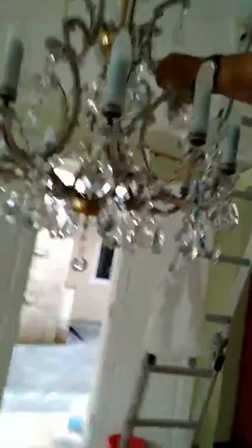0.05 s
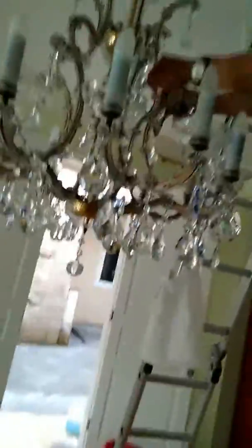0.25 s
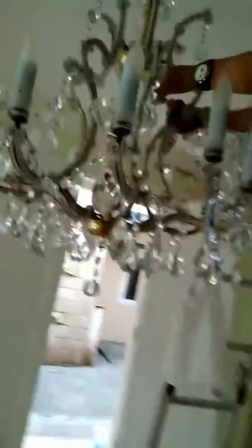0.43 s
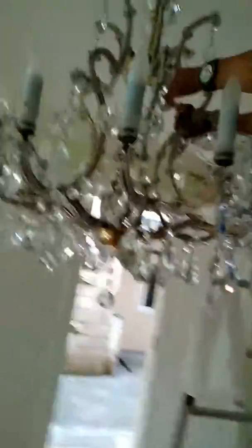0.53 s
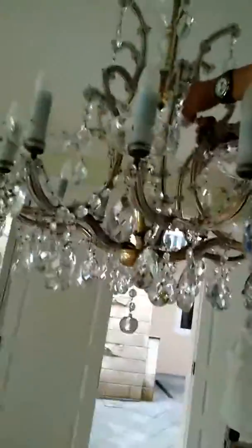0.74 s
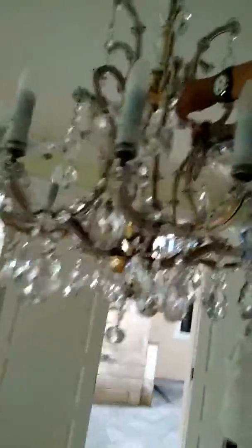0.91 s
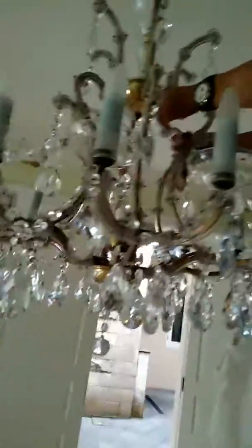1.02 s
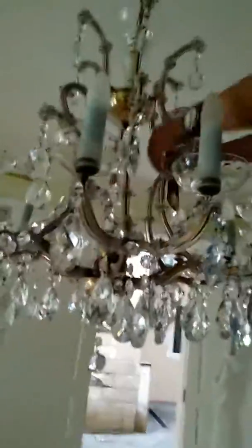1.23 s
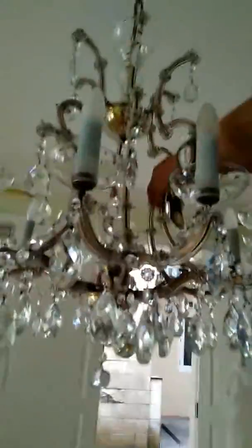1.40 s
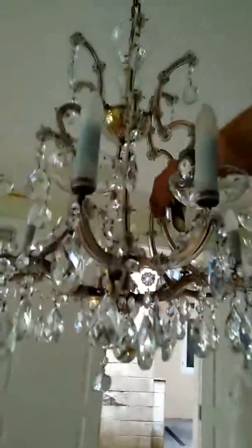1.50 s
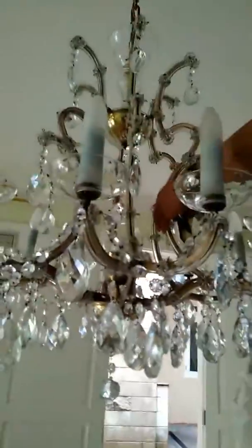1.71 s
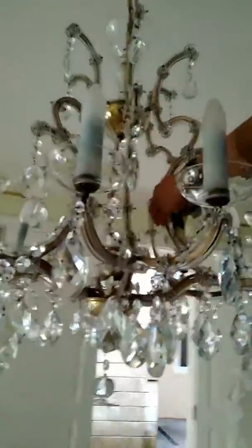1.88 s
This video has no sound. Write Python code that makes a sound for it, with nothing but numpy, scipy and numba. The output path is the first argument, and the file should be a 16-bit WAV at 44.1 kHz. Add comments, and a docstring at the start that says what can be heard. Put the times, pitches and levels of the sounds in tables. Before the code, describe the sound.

Chandelier glass drops clink in a quick jangling flurry, then one sharp high tick, room echoing

```python
"""Shaken chandelier in an echoing room

A hand shakes the glass drops of a chandelier in a bare room, close to a phone, in two bouts. Ticks of glass on
glass excite damped modes of drops, dishes, arms and frame; short, narrow tones linger. Decaying noise,
convolved with these sounds, is the room; level curves make each bout dip sharply and swell again, and shaped
noise with a few dull sine bumps is the faint hum beneath."""
import sys
import numpy as np
from scipy import signal
from scipy.fft import rfft, irfft
from scipy.io import wavfile
from scipy.ndimage import uniform_filter1d, minimum_filter1d
from numba import njit

SR = 44100
rng = np.random.default_rng(int(sys.argv[2]) if len(sys.argv) > 2 else 0)


def wrap_up_sound(samples):
    """Save the sound to the file named by the first command line argument, as 16-bit audio."""
    columns = np.atleast_2d(samples).T
    # keep every value between -1 and 1, then stretch to whole-number steps
    tamed = np.clip(columns, -1, 1)
    steps = np.round(tamed * 32767).astype(np.int16)
    wavfile.write(sys.argv[1], SR, steps)


N = 85995
LEAD_S = .3  # computed before the start, so that an earlier clink is still ringing
TOTAL = N + int(LEAD_S * SR)
PORTS_ALIKE_HZ = 636  # scale below which the two microphone ports receive nearly the same wave
MID_SIDE = np.array([[1], [-1]])  # sign of the side signal at the left and right port


def undb(db):
    """Level law: 20 dB is a factor of ten in amplitude."""
    return 10 ** (np.asarray(db) / 20)


def curve(rows, x):
    """Linear interpolation through (x, y) rows, held constant beyond the ends."""
    return np.interp(x, *np.array(rows).T)


# Clinks of the shaken glass, relative levels: [t/s, drops level/dB, drops peak f/Hz, dishes level/dB,
# arms level/dB, arms peak f/Hz, frame level/dB, left minus right level/dB, burst length t/s,
# direct sound against room feed level/dB]
CLINKS = [(-.2, -17.5, 10000, -24, -29.5, 2160, -39.5, -1, 0.013, 2),
          (0.1538, -29, 11080, -36.5, -40, 2600, -55.5, 0, 0.0088, -6.5),
          (.175, -31.5, 10800, -35.5, -43.5, 2600, -65.5, 0.5, .03, -6),
          (0.2402, -13, 10000, -29, -37, 2900, -49, 2, 0.0029, 4.5),
          (.252, -12.5, 12800, -26, -36.5, 1970, -46.5, -1, 0.0074, 9.5),
          (.266, -23.5, 12040, -28, -33.5, 1900, -40, 4, 0.0027, -11),
          (.279, -24, 8970, -31, -59, 1970, -43.5, -3.5, 0.001, -14.5),
          (0.3014, -22.5, 12000, -29, -40, 2480, -36.5, 2, 0.0058, -7.5),
          (0.3204, -17.5, 11260, -32, -33.5, 2440, -36.5, 2, .006, -5),
          (0.3713, -14, 13500, -27.5, -26.5, 2412, -33.5, 1, .004, -4),
          (.382, -16.5, 10000, -19.5, -23.5, 2200, -29, -0.5, .018, -7),
          (0.4393, -16.5, 12150, -25.5, -29, 2200, -31, 1.5, .008, -4),
          (0.4602, -7.5, 12000, -15.5, -20, 2680, -31, -3, .005, -2),
          (.476, -13, 11000, -21.5, -21.5, 1800, -39, 2, .012, -3.5),
          (.58, -24, 11000, -33, -40.5, 2398, -39.5, -3.5, 0.011, 1),
          (.82, -33, 10000, -33.5, -31.5, 2110, -49, 3, 0.0097, -6),
          (0.848, -24.5, 11230, -34.5, -43, 1970, -44, -2, 0.02, -4.5),
          (1.231, -24.5, 12690, -68.5, -84, 2006, -62, 1, 0.012, -4.5),
          (1.244, -30.5, 12300, -63.5, -73, 2008, -53.5, 1, .02, -4.5),
          (1.3912, -9.5, 12750, -46, -53.5, 1470, -73, -2.5, 0.0027, 7)]
TICKS_PER_CLINK, BURST_FALL_DB, TICK_SCATTER_DB = 13, -11.5, 0.5  # fall over the whole burst length


def clinks(rows):
    """Repeated impact: a clink is a short burst of ticks, the first on time, the later ones weaker."""
    (start, drops, drop_hz, dishes, arms, arm_hz, frame,
     pan, length, direct) = np.repeat(rows, TICKS_PER_CLINK, axis=0).T
    shape = (len(rows), TICKS_PER_CLINK)
    late = (rng.random(shape) * (np.arange(TICKS_PER_CLINK) > 0)).ravel()
    scatter = TICK_SCATTER_DB * rng.standard_normal(shape).ravel()
    extra = scatter + BURST_FALL_DB * late
    return strike_glass(start + late * length, drops + extra, drop_hz, dishes + extra,
                        arms + extra, arm_hz, frame + extra, pan, direct)


# Modes of the glass drops, dishes, arms and frame: [f/Hz, relative level/dB, 60 dB decay t/s]
DROPS = [(7730, -4, 0.0094), (8980, -6, 0.041), (10390, 0, 0.029), (11500, -2, 0.014), (12430, 1, 0.026),
         (13930, -0.5, 0.018), (13500, 3, 0.0058), (14700, -3.5, 0.03), (14350, -1, .01)]
DISHES = [(3154, -9.5, 0.023), (3395, -8, 0.033), (4002, -8, 0.026), (4290, -9, 0.054), (4803, -2.5, 0.038),
          (5307, -5.5, 0.04), (5680, -5, .03), (6305, -3.5, .03), (6710, -3, 0.031), (7170, -5.5, 0.066),
          (8000, 6.5, 0.02)]
ARMS = [(1352.5, -7.5, 0.039), (1600, -3.5, 0.039), (1900, 0.5, 0.03), (2107, -3.5, 0.035), (2353, -6, .05),
        (2600, -7, 0.1), (2875, -2.5, 0.049)]
FRAME = [(287, -18.5, 0.041), (416, -8.5, 0.032), (527, -10, 0.042), (653, -5, 0.032), (820, -5.5, 0.035),
         (934, -4, 0.038), (1108, -6.5, 0.03)]
# Dry crack of glass on glass: [f/Hz, relative level/dB, 60 dB decay t/s]
CRACK = [(1520, -8.5, 0.011), (2700, -5, .008), (3900, -1.5, 0.0068), (5100, 0.5, .006), (5900, 1.5, .006),
         (6600, 0, .006)]
CRACK_DB = -21  # against the drops
# Spread of pitch from piece to piece, standard deviation of ln f
DROP_SIZES, DISH_SIZES, ARM_SIZES, CRACK_SIZES = 0.0586, .05, 0.04, 0.026
DROP_WIDTH_HZ, ARM_WIDTH_HZ = 3600, 716  # modes this far from the loudest pitch are 6 dB down


def strike_glass(times, drops_db, drop_hz, dish_db, arm_db, arm_hz, frame_db, pan, direct_db):
    """Modal excitation: each tick cracks and sets drops, dishes, arms and frame ringing."""
    where = (pan, direct_db)
    drops = ring(times, drops_db, *where, DROPS, DROP_SIZES, drop_hz, DROP_WIDTH_HZ)
    dishes = ring(times, dish_db, *where, DISHES, DISH_SIZES)
    crack = ring(times, drops_db + CRACK_DB, *where, CRACK, CRACK_SIZES)
    arms = ring(times, arm_db, *where, ARMS, ARM_SIZES, arm_hz, ARM_WIDTH_HZ)
    frame = ring(times, frame_db, *where, FRAME, ARM_SIZES)
    return drops + dishes + crack + arms + frame


# Balance of the two microphone ports: [f/Hz, left minus right level/dB]
PORT_BALANCE = [(500, 0), (1400, 1.5), (2800, 0.5), (5600, 0), (9500, -2.5), (11500, -1), (14000, 4.5)]
MODE_SCATTER_DB, SWELL_CYCLES = 1.5, 1


def ring(times, db, pan, direct_db, modes, sizes, peak_hz=0, width_hz=np.inf):
    """Modal superposition: each tick draws new pitch, strength and phase, partly unlike at the two ports."""
    at = ((times + LEAD_S) * SR).astype(np.int64)
    out = np.zeros((2, 2, TOTAL))  # port, path (direct or room feed), sample
    for hz, mode_db, t60 in modes:
        # rows: strength left, strength right, common phase, phase between ports, pitch
        chance = rng.standard_normal((len(at), 5)).T
        pitch = np.minimum(hz * np.exp(sizes * chance[4]), .45 * SR)
        tilt = -6 * ((pitch - peak_hz) / width_hz) ** 2
        balance = pan + curve(PORT_BALANCE, pitch)
        for port, side in enumerate((.5, -.5)):
            level = db + mode_db + tilt + side * balance + MODE_SCATTER_DB * chance[port]
            phase = 2 * np.pi * chance[2] + port * hz / PORTS_ALIKE_HZ * chance[3]
            size = undb(level) * np.exp(1j * phase)
            add_modes(out[port], at, pitch, size, undb(direct_db), 1. * t60, 1. * SWELL_CYCLES)
    return out / np.sqrt(len(modes))


@njit
def add_modes(out, at, hz, size, direct, t60, swell):
    """Damped oscillation: swelling, decaying sines go straight to the phone (row 0) and into the room (row 1)."""
    for k in range(len(at)):
        turn = np.exp(2j * np.pi * hz[k] / SR - np.log(1000) / (t60 * SR))
        settle = np.exp(-hz[k] / (swell * SR))
        z, rest = size[k], 1.
        for i in range(at[k], min(at[k] + int(.7 * t60 * SR), out.shape[1])):  # to 42 dB down
            v = z.imag * (1 - rest) * (1 - rest)
            out[0, i] += v * direct[k]
            out[1, i] += v
            z, rest = z * turn, rest * settle


# Short, narrow tones that linger after the clinks: [t/s, f/Hz, relative level/dB, 60 dB decay t/s]
LINGERING_TONES = [(.154, 2610, -39, 0.06), (.16, 2765, -40, 0.071), (.156, 4840, -46.5, 0.18),
                   (.241, 4861, -29, 0.043), (.241, 3090, -23, 0.033), (.243, 5739, -32.5, 0.097),
                   (.252, 7620, -33, 0.16), (.258, 1900, -29.5, 0.032), (.315, 2500, -33, .08),
                   (.372, 6925, -25.5, .1), (.376, 5300, -30, 0.042), (.385, 2200, -27.5, 0.052),
                   (.385, 4230, -28.5, 0.15), (.39, 4872, -31.5, .08), (.461, 2804, -26, .12),
                   (.461, 6460, -25.5, 0.082), (.462, 4250, -27.5, 0.14), (.462, 7450, -27.5, 0.34),
                   (.465, 2413, -29, 0.24), (.465, 5320, -26, .3), (.47, 4776, -32, .3),
                   (.47, 3193, -28, 0.1), (.474, 1680, -24.5, 0.082), (.476, 1522, -30.5, .12),
                   (.52, 2030, -32, 0.29), (.58, 6330, -33.5, .1), (.241, 9862, -16, .1),
                   (.252, 12130, -20.5, .06), (.372, 13820, -23, .1), (.47, 10870, -25.5, .15),
                   (.47, 10928, -20, .15), (.465, 13380, -21, .12), (.53, 4540, -33, .15),
                   (.58, 10988, -26.5, .15), (.6, 3540, -36.5, .15), (.6, 7890, -35.5, .15),
                   (.66, 1600, -37.5, .12), (.7, 4448, -39.5, .15), (.7, 2920, -39, .15),
                   (.82, 2013, -45.5, .15), (.85, 9970, -36.5, .2), (1.4, 8780, -50.5, .2),
                   (1.45, 8160, -52, 0.28), (1.46, 7160, -54, .2), (1.4, 5410, -58, .2),
                   (1.4, 6874, -53, .25), (1.4, 7187, -49, .2), (1.4, 6170, -53, .15),
                   (1.4, 7900, -44, 0.28), (1.41, 4180, -63, 0.17), (1.43, 6550, -56.5, .2)]
TONE_DIRECT_DB, TONE_ROOM_DB = -2.5, -6.5
PAIR_HZ, PAIR_DB = 27.2, -4.5  # spacing and relative level of the upper twin tone


def lingering_tones(rows):
    """Beating: each tone is a close pair, the upper one weaker."""
    direct = np.array([TONE_DIRECT_DB - TONE_ROOM_DB])
    out = 0
    for s, hz, db, t60 in rows:
        pair = [(hz, 0, t60), (hz + PAIR_HZ, PAIR_DB, t60)]
        out = out + ring(np.array([s]), db + TONE_ROOM_DB, 0, direct, pair, 0)
    return out


# Small rattle of the swinging drops: [t/s, relative level/dB]
RATTLE = [(.23, -52), (.25, -33.5), (.35, -38), (.45, -34), (.55, -35.5), (.65, -58.5), (.78, -55.5)]
RATTLE_TICKS, RATTLE_SCATTER_DB = 110, 4.5
RATTLE_DISH_DB, RATTLE_ARM_DB, RATTLE_FRAME_DB = -8, -8, -23.5  # against the drops
RATTLE_HZ, RATTLE_ARM_HZ = 11200, 2200  # loudest pitch of the drops and of the arms


def rattle():
    """Random impacts: small ticks at uniformly drawn moments while the drops swing."""
    start, end = RATTLE[0][0], RATTLE[-1][0]
    times = start + rng.random(RATTLE_TICKS) * (end - start)
    db = curve(RATTLE, times) + RATTLE_SCATTER_DB * np.minimum(rng.exponential(size=len(times)), 2)
    centred = 0 * times
    return strike_glass(times, db, RATTLE_HZ, db + RATTLE_DISH_DB, db + RATTLE_ARM_DB,
                        RATTLE_ARM_HZ, db + RATTLE_FRAME_DB, centred, centred)


# Reverberation of the room by band: [f/Hz, 60 dB decay t/s, relative level/dB]
ROOM = [(360, 1, -18.5), (770, 1.09, -6), (1600, 1.255, -10), (3400, 1.305, -10), (6200, 1.267, -12),
        (10000, 0.92, -9.5), (13990, 0.66, -13)]
ROOM_DELAY_S, ROOM_BUILD_S = .004, 0.004


def room_response():
    """Diffuse reverberation: band noise builds up and decays, alike at both ports only in the bass."""
    t = np.arange(int(1.6 * SR)) / SR
    f = np.fft.rfftfreq(len(t), 1 / SR) + 1  # 1 Hz added, so that the logarithm exists
    centres = np.log(np.array(ROOM)[:, 0])
    mid, side = rfft(rng.standard_normal((2, len(t))))
    apart = np.minimum(f / (2 * PORTS_ALIKE_HZ), 1)
    spectrum = (mid + apart * side * MID_SIDE) / np.sqrt(1 + apart ** 2)
    late = np.maximum(t - ROOM_DELAY_S, 0)
    out = 0
    for k, (hz, t60, db) in enumerate(ROOM):
        share = np.interp(np.log(f), centres, np.arange(len(ROOM)) == k)  # overlapping triangles
        out = out + irfft(spectrum * share, len(t)) * undb(db - 60 * late / t60)
    return out * (1 - np.exp(-late / ROOM_BUILD_S)) / np.sqrt(SR / 100)


# Spectrum of the hum: [f/Hz, relative level/dB]
HUM = [(18, -63), (30, -21.5), (102, -9), (125, -10), (612, -32), (735, -31), (3230, -43), (11000, -35),
       (15000, -45)]
# Course of the hum: [t/s, level/dB]
HUM_LEVEL = [(0.0, -68.5), (0.222, -74.5), (0.476, -62.5), (0.516, -70.5), (0.786, -70), (0.922, -71),
             (1.324, -71), (1.406, -67.5), (1.542, -72), (1.65, -71), (1.672, -69.5), (1.83, -78.5),
             (1.922, -74.5), (1.95, -76)]
HUM_SIDE_DB = -8  # part that differs between the ports
# Dull bumps: [t/s, level/dB, f/Hz, 60 dB decay t/s]
BUMPS = [(.3, -62, 30, .15), (.74, -66, 55, 0.21), (.8, -58, 48, .2), (1.12, -64.5, 350, .15),
         (.459, -54.5, 40, 0.065), (0.461, -56.5, 220.4, 0.028), (1.611, -52, 109, 0.1),
         (1.643, -46.5, 102, 0.098)]


def hum(t):
    """Filtered noise: a faint low rumble, much alike at both ports, with damped sines as bumps."""
    f = np.fft.rfftfreq(N, 1 / SR) + 1
    hum_hz, hum_db = np.array(HUM).T
    shape = undb(np.interp(np.log(f), np.log(hum_hz), hum_db))
    mid, side = irfft(rfft(rng.standard_normal((2, N))) * shape, N)
    noise = (mid + undb(HUM_SIDE_DB) * side * MID_SIDE) / mid.std()
    out = noise * undb(curve(HUM_LEVEL, t))
    for s, db, hz, t60 in BUMPS:
        age = np.maximum(t - s, 0)
        out = out + undb(db - 60 * age / t60) * np.sin(2 * np.pi * hz * age)
    return out


def hear(sound, room):
    """Linear superposition: direct sound plus the room feed convolved with the room response."""
    reverberant = signal.fftconvolve(room, sound[:, 1], axes=1)[:, :TOTAL]
    return (sound[:, 0] + reverberant)[:, TOTAL - N:]


# Level curves of the first and the second bout with its room sound: [t/s, gain level/dB]
FADE_FIRST = [(.98, 9), (1.08, 3.5), (1.13, -4), (1.17, -14), (1.3, -3.5), (1.95, 1.5)]
FADE_SECOND = [(1.26, 4.5), (1.3, 1), (1.36, -3.5), (1.38, -8), (1.389, 17), (1.398, 0), (1.41, 5.5),
               (1.46, 7.5), (1.53, -8.5), (1.64, -12), (1.95, -23.5)]
PAUSE_S = 1.2  # divides the two bouts
SECOND_RING_HZ, SECOND_LOW_DB = 9300, -11.5  # the room ring of the second bout is weak under this pitch


def scene():
    """Superposition of sources: two bouts, each under its level curve, over the hum."""
    t = np.arange(N) / SR

    def early(rows):
        return [row for row in rows if row[0] < PAUSE_S]

    def late(rows):
        return [row for row in rows if row[0] > PAUSE_S]

    response = room_response()
    highpass = signal.butter(3, SECOND_RING_HZ, "high", fs=SR, output="sos")
    bright_response = signal.sosfilt(highpass, response) + undb(SECOND_LOW_DB) * response
    first = hear(clinks(early(CLINKS)) + lingering_tones(early(LINGERING_TONES)) + rattle(), response)
    second = hear(clinks(late(CLINKS)) + lingering_tones(late(LINGERING_TONES)), bright_response)
    return first * undb(curve(FADE_FIRST, t)) + second * undb(curve(FADE_SECOND, t)) + hum(t)


LIMIT, LIMIT_S, TOP_HZ = .86, .002, 15900


def record(dry):
    """Peak limiting and low-pass filtering: the phone ducks both channels around peaks and cuts the top."""
    k = int(LIMIT_S * SR)
    gain = LIMIT / np.maximum(np.abs(dry).max(axis=0), LIMIT)
    smooth_gain = uniform_filter1d(minimum_filter1d(gain, 2 * k + 1), k)
    lowpass = signal.ellip(10, .2, 65, TOP_HZ, fs=SR, output="sos")
    return signal.sosfilt(lowpass, dry * smooth_gain)


dry = scene()
out = record(dry)
wrap_up_sound(out)
```